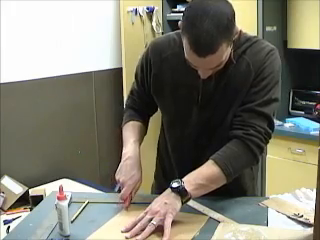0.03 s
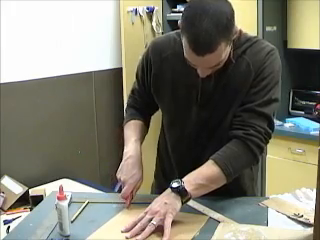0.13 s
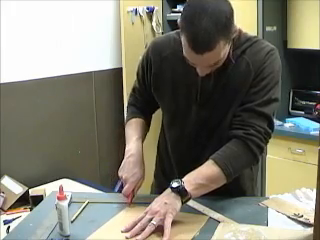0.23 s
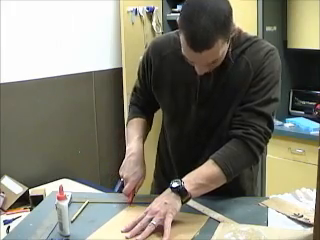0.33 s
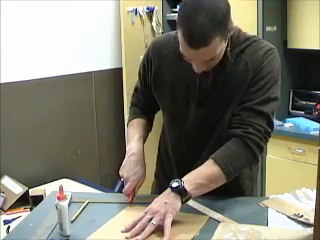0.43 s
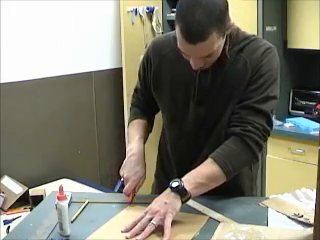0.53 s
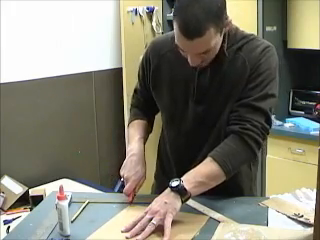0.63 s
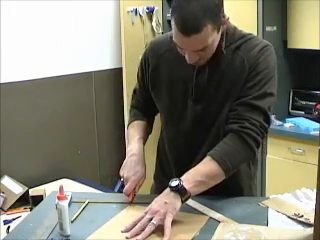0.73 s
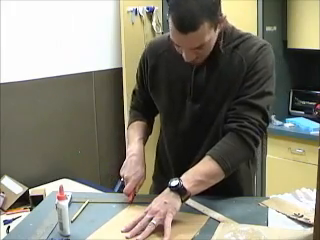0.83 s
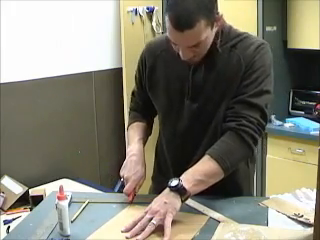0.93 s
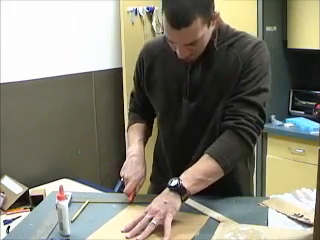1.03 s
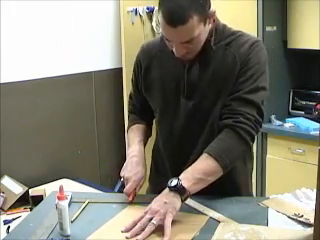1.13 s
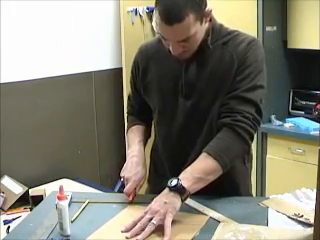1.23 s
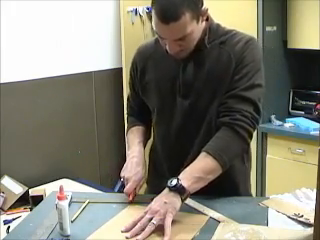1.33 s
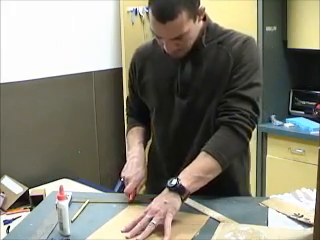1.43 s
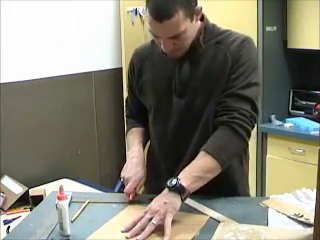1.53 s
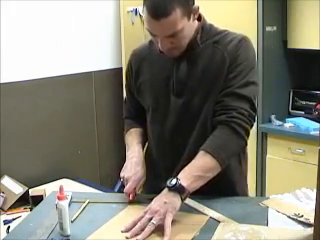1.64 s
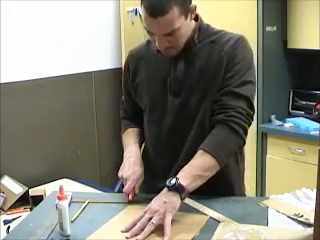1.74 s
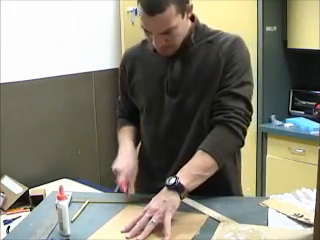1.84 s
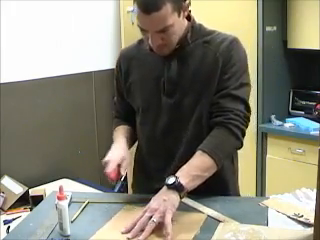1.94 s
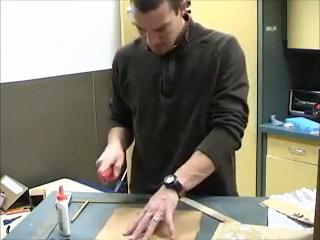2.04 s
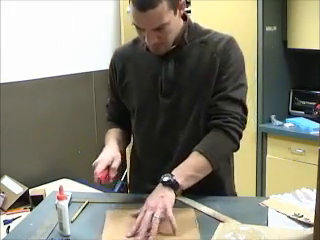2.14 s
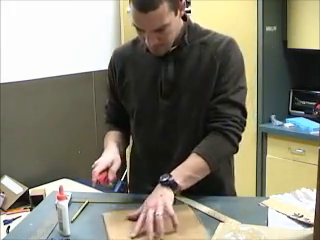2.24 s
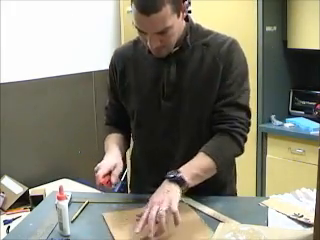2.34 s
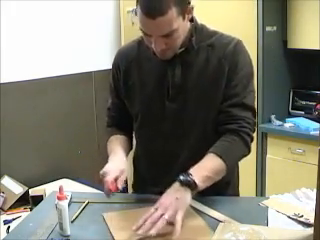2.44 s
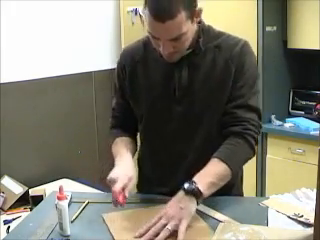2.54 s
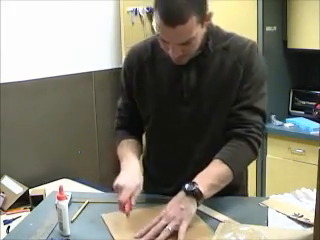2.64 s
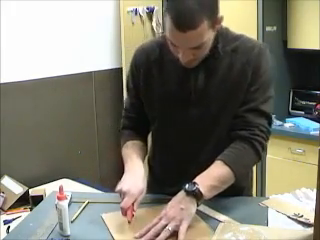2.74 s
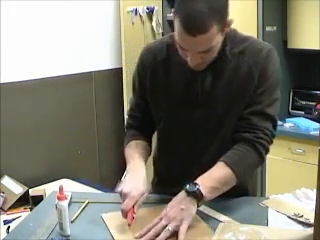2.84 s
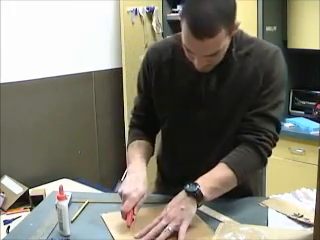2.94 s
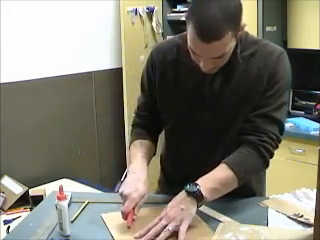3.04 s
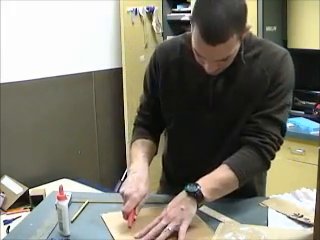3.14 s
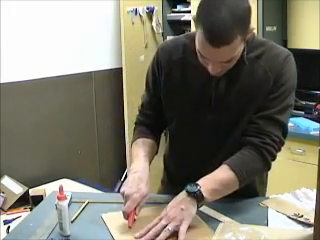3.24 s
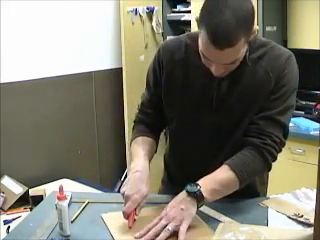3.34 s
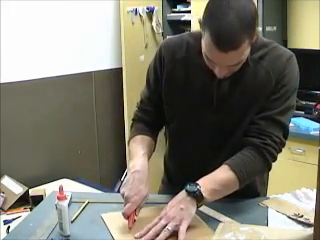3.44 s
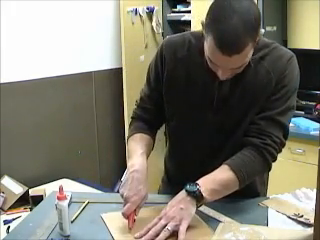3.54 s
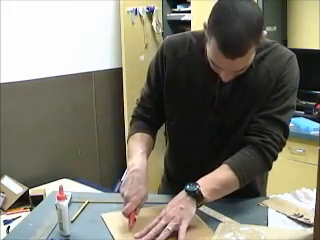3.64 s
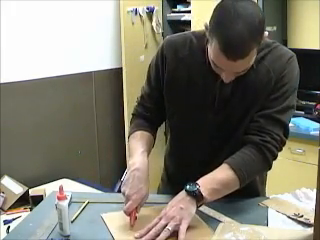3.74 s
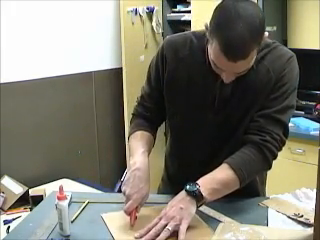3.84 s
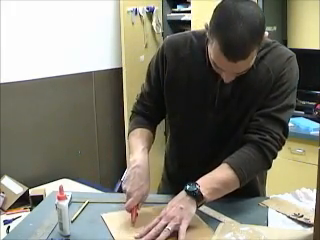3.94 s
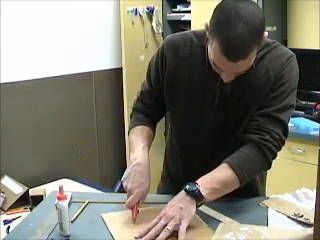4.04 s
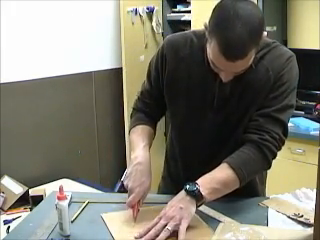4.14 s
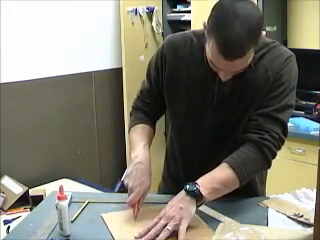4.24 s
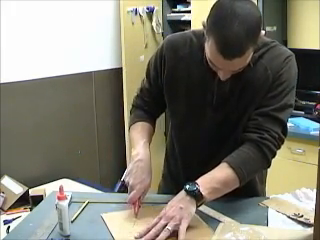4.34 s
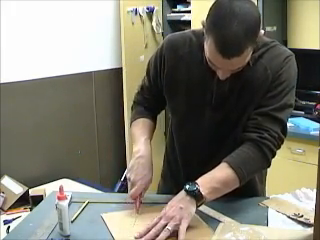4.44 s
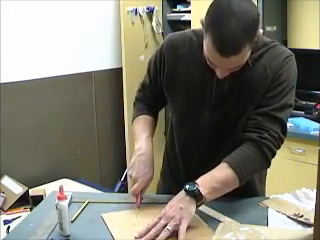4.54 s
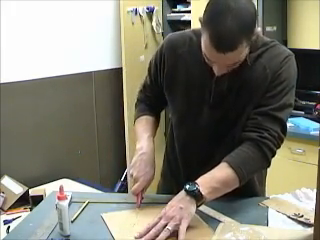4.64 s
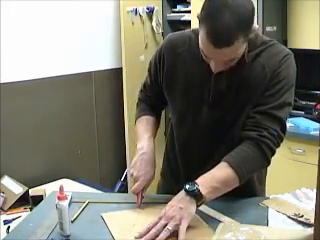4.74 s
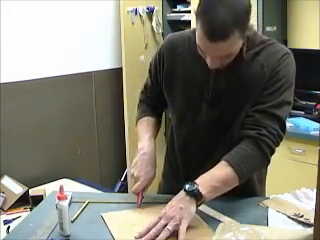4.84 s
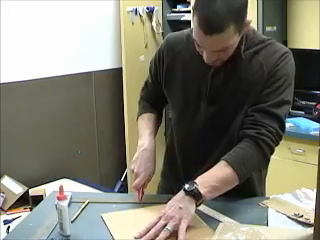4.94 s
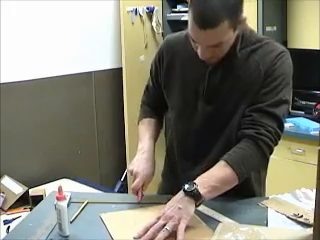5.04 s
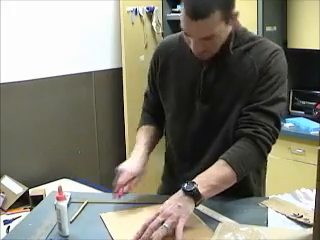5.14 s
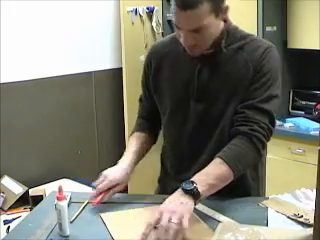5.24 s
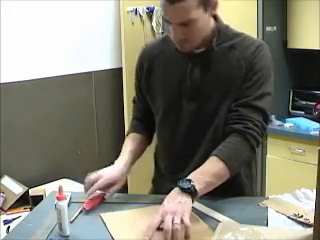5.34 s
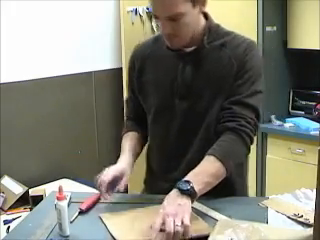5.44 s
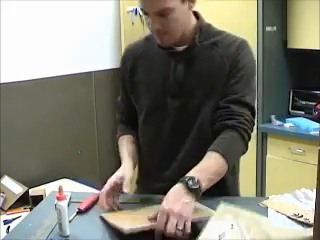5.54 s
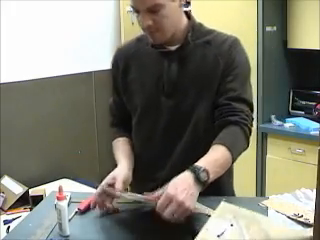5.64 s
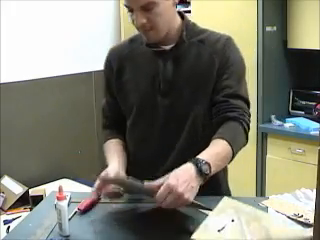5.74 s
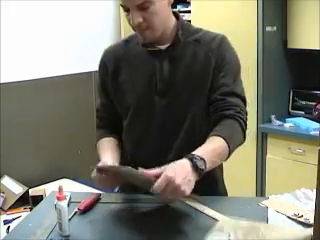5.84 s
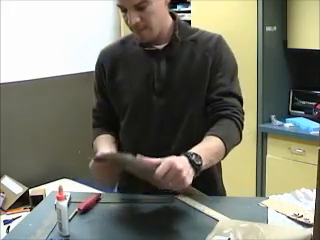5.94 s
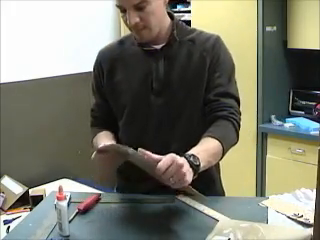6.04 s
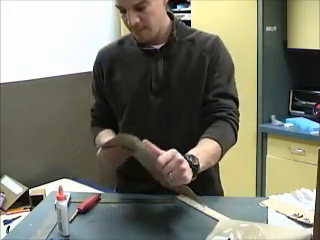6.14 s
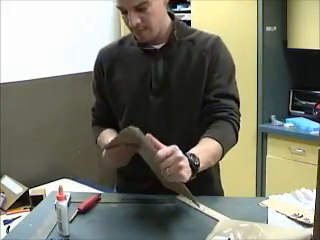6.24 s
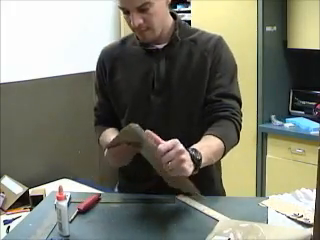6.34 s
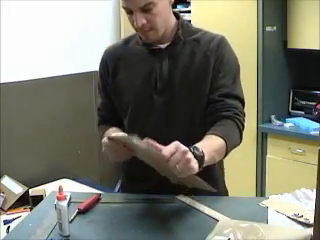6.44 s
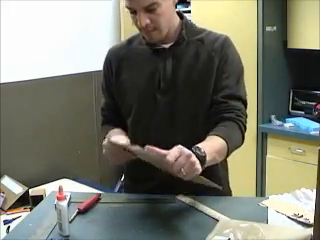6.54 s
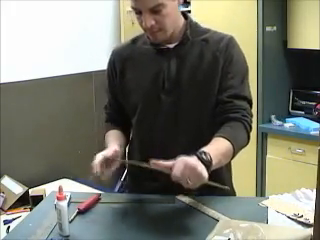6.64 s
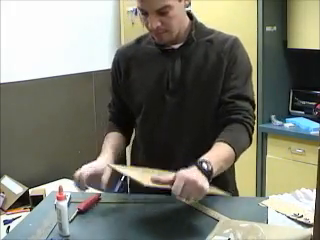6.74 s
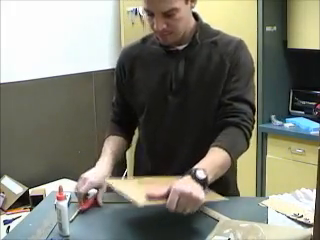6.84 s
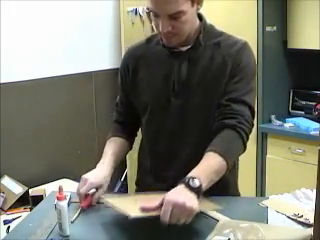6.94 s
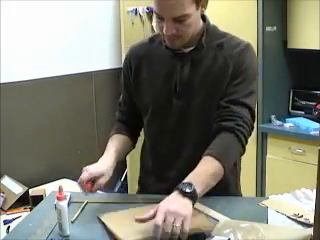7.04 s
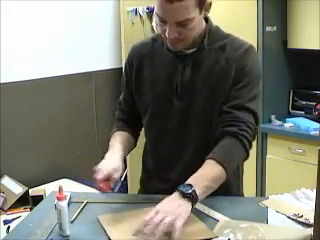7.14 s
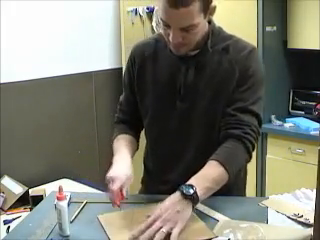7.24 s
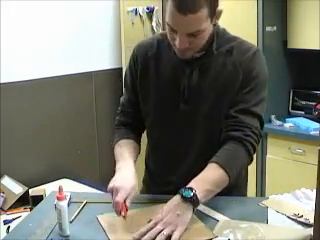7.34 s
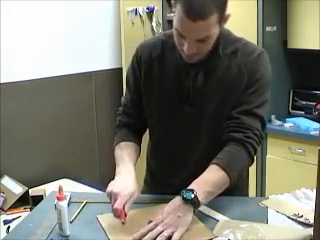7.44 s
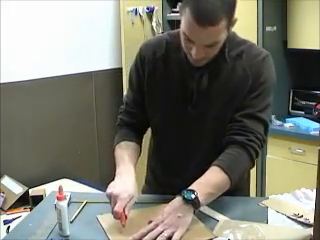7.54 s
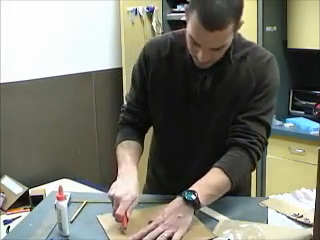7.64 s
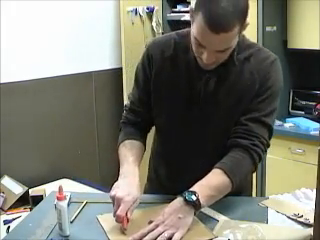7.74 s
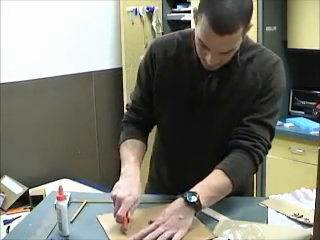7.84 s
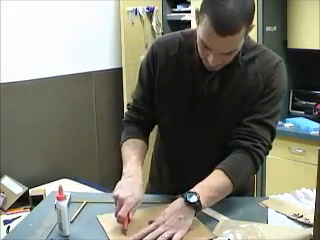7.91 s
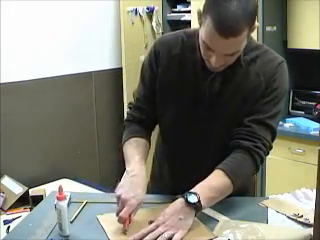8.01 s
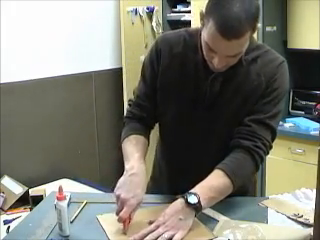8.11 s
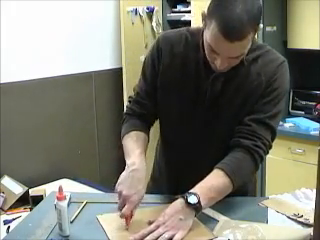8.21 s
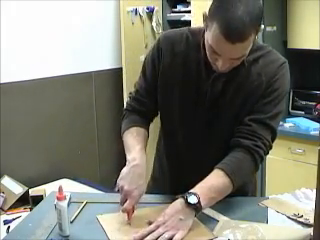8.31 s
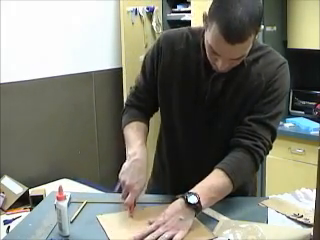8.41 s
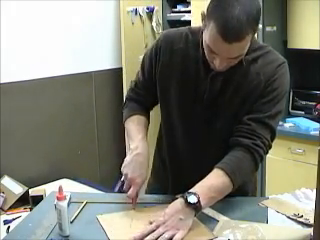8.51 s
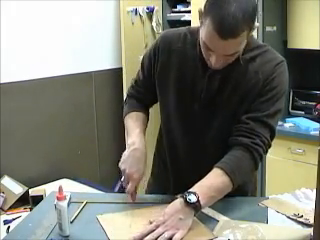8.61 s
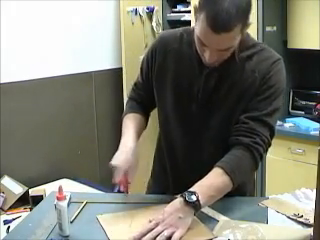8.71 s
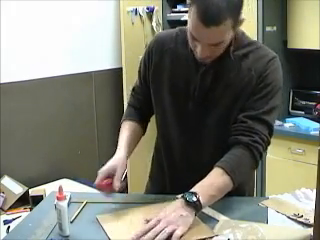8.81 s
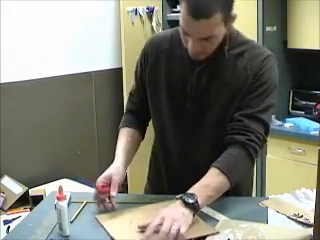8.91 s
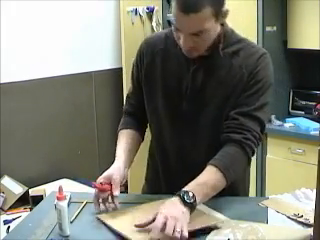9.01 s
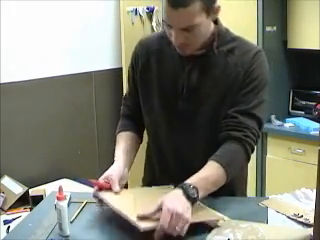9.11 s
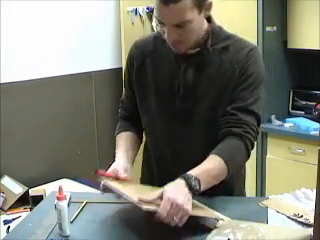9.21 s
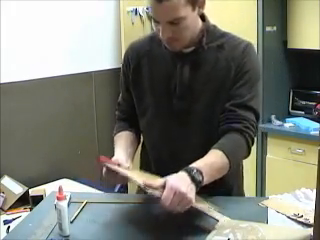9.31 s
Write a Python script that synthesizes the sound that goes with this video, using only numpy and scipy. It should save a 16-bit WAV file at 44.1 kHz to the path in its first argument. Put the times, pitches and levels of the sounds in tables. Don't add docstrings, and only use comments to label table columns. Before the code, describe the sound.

Scratchy cardboard cutting with pauses, a sharp snap, a knife dropped with a hard rattle, then a final loud rip above steady ventilation hum.

```python
import sys
import numpy as np
from scipy import signal
from scipy.fft import rfft, irfft, next_fast_len
from scipy.io import wavfile
from scipy.ndimage import uniform_filter1d

SR = 44100
rng = np.random.default_rng(int(sys.argv[2]) if len(sys.argv) > 2 else 0)


def nominal_scale(level):
    x = np.asarray(level, float) / 20
    return 10 ** x


def materialize(psi):
    bounded = np.clip(np.atleast_2d(psi).T, -1, 1)
    quanta = np.round(bounded * 32767).astype(np.int16)
    wavfile.write(sys.argv[1], SR, quanta)


N = 413216
TIME = np.arange(N) / SR
STEPS = TIME[::32]


def on_log(table, hz):
    table_hz, value = np.array(table).T
    return np.interp(np.log(hz), np.log(table_hz), value)


def band(x, hz, width_hz):
    return signal.lfilter(*signal.iirpeak(min(hz, .45 * SR), hz / width_hz, SR), x)


def colour(x, gain):
    size = next_fast_len(N + SR)
    hz = np.arange(1, size // 2 + 2) * SR / size
    return irfft(rfft(x, size) * gain(hz), size)[..., :N]


def unit(x):
    return x / np.sqrt(np.mean(x ** 2))


def walk(rate_hz):
    hold = int(len(STEPS) * SR / N / rate_hz)
    levels = np.repeat(rng.standard_normal(len(STEPS) // hold + 1), hold)
    slewed = uniform_filter1d(uniform_filter1d(levels, hold), hold)
    return unit(slewed[:len(STEPS)])


def smooth(slow):
    return np.interp(TIME, STEPS, slow)


def rub(tears_per_s=5000, scatter_db=3.5, even=1.22, grip_db=1.22, level_db=-2):
    # centre_hz, trim_db
    layers = [(150, -16), (260, -4), (850, -2), (2800, -0.5), (7500, -1), (11500, -3.5)]
    sizes = nominal_scale(scatter_db * np.minimum(rng.exponential(size=N), 3.))
    tears = (rng.random(N) < tears_per_s / SR) * rng.standard_normal(N) * sizes
    stick_slip = smooth(nominal_scale(grip_db * walk(60)))
    force = (unit(tears) + even * rng.standard_normal(N)) * stick_slip
    out = 0
    for k, (_, trim_db) in enumerate(layers):
        share = [(hz, j == k) for j, (hz, _) in enumerate(layers)]
        part = unit(colour(force, lambda hz: on_log(share, hz) / np.sqrt(hz) * (hz > 120)))
        flicker_db = .9 * walk(25)
        out = out + part * smooth(gestures(k) * nominal_scale(flicker_db + trim_db + level_db))
    return sheet(out)


def gestures(k):
    # time_s, scratch_db, weight_db
    cuts = [
        [(0.0, -32.5, -4), (0.174, -38, -5), (0.216, -42, -2), (0.24, -35, 3), (0.274, -42, -9),
         (0.278, -33.5, -2), (0.406, -37.5, -4), (0.55, -74, -3)],
        [(2.02, -51, -11), (2.048, -44, -5), (2.092, -45.5, -15), (2.274, -41.5, -12.5), (2.282, -47, -1.5),
         (2.406, -39.5, -13), (2.45, -52.5, -1), (2.56, -71.5, -5)],
        [(3.975, -43, -1), (3.981, -41, -5), (3.993, -33, 0), (4.119, -30.5, 0.5), (4.161, -41.5, -2),
         (4.181, -35.5, 6.5), (4.261, -47.5, -2), (4.27, -47, -5)],
        [(4.271, -43, 3), (4.305, -33.5, -3), (4.347, -44, 0), (4.363, -34, 0), (4.436, -36, -3),
         (4.59, -27, -4.5), (4.64, -29.5, -3), (4.723, -61, 8), (4.76, -49, -5)],
        [(8.18, -47, -3), (8.416, -30, 6), (8.424, -26.5, -3.5), (8.502, -30, 4.5), (8.541, -20, -1),
         (8.645, -23, -3.5), (8.734, -32, -7), (8.82, -62, -13), (8.87, -72, -29)],
    ]
    cut_edges = [-1.5, 0, -1.5, -2.5, -9.5]
    # start_s, scratch_db, fall_20db_s, weight_db, edge_db
    shivers = [(.279, -39, 0.21, -1.5, -2), (0.742, -37, -0.5, 0, -34), (1.53, -44, 0.5, 1, -13),
               (1.9, -44, 0.3, -11.5, -1), (2.636, -39, 0.12, -28, -6), (3.225, -52.5, 0.4, 9.5, -15),
               (3.531, -30.5, 0.13, 6, -5), (4.442, -31, 0.44, -6, -1.5), (5.025, -20, 0.14, -13, -12),
               (5.076, -25.5, 0.15, -14, -15), (5.395, -19.5, 0.105, 2, 1), (5.429, -14.5, 0.1155, 0, -2.5),
               (5.461, -21, 0.257, -1, -6.5), (5.973, -25.5, 0.11, 1.5, -15),
               (6.249, -19.5, 0.1, -10.5, -4), (6.519, -43.5, 0.05, 12, -4), (6.939, -26, 0.24, -7, -10),
               (5.967, -40, 0.02, 5, -8), (6.225, -39, 0.15, -5, 0), (7.995, -45.5, 0, -3, 0),
               (7.205, -31.5, 0.1, -2.5, -19), (8.021, -43.5, 0.35, -5, -4.5), (8.115, -41.5, 0, -1.5, -11),
               (8.423, -23.5, 0.28, -3, -22), (8.954, -31.5, 0.17, -3, -10), (9.3, -20, 0.03, -1.5, -21)]
    # peak_s, scratch_db, rise_20db_s, fall_20db_s, weight_db
    slides = [(.889, -45, 0.28, 0.07, -5), (1.49, -53, 0.5, -2.5, -18), (1.64, -55, -1.3, -0.26, 13),
              (3.28, -60.5, 1.2, 0.5, -10), (3.393, -59, -0.16, 0.7, -13), (3.487, -55.5, -0.2, 3.7, -3),
              (3.762, -31.5, 0.01, .1, -1.5), (3.82, -34.5, 0.06, 0.09, -4.5), (4.784, -32, -0.01, 0.1, -2),
              (5.004, -29.5, 0.05, 0.06, 0), (5.968, -57, 0.3, 0.23, 3), (5.77, -38, 0.1, 0.1, -2),
              (5.855, -43, 0.5, 0.3, -14), (5.925, -37.5, 0.23, 0.18, -11), (6.1, -46, 0.93, 0.45, 2.5),
              (6.234, -36, 0, 0.2, -10.5), (6.545, -51.5, 0.7, .45, 0), (6.7, -46.5, 0.5, 0.33, -2.5),
              (7.1, -46.5, 0.48, 0.17, 2.5), (7.361, -42, 0.1, 0.1, -11), (7.81, -48, 0, -0.3, -7.5),
              (8.629, -29.5, 0.1453, 0.12, -2), (9.143, -43, 1.2, 1, -3), (9.37, -37, 0.2, 2, -4)]
    # weight_share, hiss_share, fall_factor, loss_db_per_db above quiet
    follow = [(.7, 0.48, 1, 0.1), (.7, 0.2, 2.1, 0.5), (1, 0, 0.94, 0.12), (0, 0.055, 0.81, 0),
              (0, 1, .95, 0), (0, 0.68, 0.73, 0)]
    blow_rise_s, slide_edge_db, quiet_db = 0.0052, -3, -54.5
    heavy, sharp, linger, squash = follow[k]

    def gain(db, weight_db, edge_db):
        loss_db = squash * np.maximum(db - quiet_db, 0)
        return nominal_scale(db + heavy * weight_db + sharp * edge_db - loss_db)

    power = 0
    for cut, edge_db in zip(cuts, cut_edges):
        s, db, weight_db = np.array(cut).T
        stroke_db = np.interp(STEPS, s, db, -99, -99)
        power = power + gain(stroke_db, np.interp(STEPS, s, weight_db), edge_db) ** 2
    moves = [(s, db, blow_rise_s, fall_s, weight_db, edge_db) for s, db, fall_s, weight_db, edge_db in shivers]
    moves += [(*row, slide_edge_db) for row in slides]
    for s, db, rise_s, fall_s, weight_db, edge_db in moves:
        before = (s - STEPS) / max(rise_s, .001)
        after = (STEPS - s) / max(fall_s * linger, .001)
        fade = np.minimum(np.maximum(before, after), 10)
        power = power + (gain(db, weight_db, edge_db) * nominal_scale(-20 * fade)) ** 2
    return np.sqrt(power)


def sheet(x):
    # centre_hz, width_hz, lift_db
    board = [(219.3, 20, 9.5), (417, 64, -2.5), (624, 52, 6.5), (1630, 33, 3), (4140, 1440, 3)]
    # centre_hz, width_hz, lift_db
    flap = [(676, 92, 10), (1600, 120, 10), (4450, 2600, 7.7), (1500, 230, 5.7), (1090, 81, 7.4),
            (217, 56, 12.5), (650, 100, 8.2), (1030, 760, 9.1), (1060, 110, 2.9), (1400, 250, 4.7),
            (1080, 73, 8.4), (673, 77, 9), (850, 160, 10.5), (1700, 260, 7), (1060, 230, 7.2),
            (3260, 390, 7.2), (3900, 270, 5.6), (3270, 150, 5), (1900, 150, 5.6), (5230, 220, 3.4),
            (1900, 47, 5.4), (3200, 120, 6), (3550, 140, 4.7), (2040, 150, 6.4), (3400, 290, 4),
            (2300, 200, 5), (5300, 150, 6), (4000, 350, 4.3), (9900, 390, 13), (5200, 350, 8.9)]
    # start_s, end_s
    flap_spans = [(-.5, .52), (.7, 1), (2.2, 2.5), (3.5, 3.7), (3.74, 4.26), (4.42, 4.76), (4.4, 4.74),
                  (5, 5.55), (5.5, 6.1), (6.9, 7.1), (8.25, 8.55), (8.4, 8.68), (8.55, 8.85), (8.25, 8.8),
                  (8.4, 8.8), (8.2, 8.8), (-.3, .45), (.1, .45), (-.2, .15), (-.2, .15), (8.33, 8.44),
                  (8.24, 8.36), (8.38, 8.6), (8.54, 8.78), (3.96, 4.14), (4, 4.14), (4.45, 4.53),
                  (4.34, 4.5), (6.22, 6.34), (7.99, 8.07)]
    out = x + sum((nominal_scale(lift_db) - 1) * band(x, hz, width_hz) for hz, width_hz, lift_db in board)
    for (start_s, end_s), (hz, width_hz, lift_db) in zip(flap_spans, flap):
        span = (TIME > start_s) & (TIME < end_s)
        swell = np.sin(np.pi * (TIME[span] - start_s) / (end_s - start_s)) ** .5
        out[span] += (nominal_scale(lift_db) - 1) * swell * band(x[span], hz, width_hz)
    return out


def knocks(tick_db=2, rattle_db=-12):
    # start_s, peak_db, edge_db, rattle_s
    creases = [(0.279, -6, 2, 0.004), (0.878, -22, -1.5, 0.052), (1.399, -29.5, 3.5, 0.012),
               (1.4855, -23, -3, 0.042), (3.5278, 1, -6, 0.019), (3.744, -17.5, -7, 0.018),
               (3.9809, -19.5, 2, 0.018), (4.36, -19, -16, 0.048), (4.4426, -14.5, -4, 0.0099),
               (4.5936, -5, -1, 0.011), (4.9669, -14.5, -3.5, 0.029), (5.7463, -25, -31, 0.082),
               (5.842, -14.5, -21.5, 0.016), (5.884, -13, -19, 0.017), (6.245, -3, 4.5, 0.017),
               (6.527, -26.5, -8, 0.049), (9.175, -32, 9, .02), (6.2328, -15, 3, 0.011),
               (.03, -21, 4, 0.022), (4.6, -14, -7, .015)]
    # start_s, peak_db, body_db, rattle_s
    taps = [(.7416, -29, -12, 0.0081), (1.1242, -29, -13.5, 0.009), (1.5292, -10, -44, 0.0092),
            (1.7537, -23, -22, 0.012), (2.6359, -22.5, -32, .013), (3.062, -40.5, -2.5, 0.024),
            (3.3806, -30, -16, .02), (4.176, -20, -8, 0.015), (4.781, -19, -21.5, 0.079),
            (5.0247, 0.5, -21, 0.017), (5.0745, -9.5, -16.5, 0.014), (5.254, -23.5, -26, 0.08),
            (5.3924, -2.5, -14.5, 0.02), (5.4296, 3, -12, 0.01), (5.648, -23, -9.5, 0.016),
            (5.929, -20, -13, 0.0092), (5.9744, -19, -10.5, 0.024), (6.801, -25.5, -14.5, 0.039),
            (6.9378, -19, -15.5, 0.034), (6.981, -17.5, -14, 0.054), (7.1258, -20, -12.5, 0.031),
            (7.207, -27, -14, .016), (8.0208, -16, -32.5, 0.034), (8.114, -12.5, -38, 0.011),
            (8.2702, -17, -22, 0.037), (8.3427, -30.5, -2, 0.034), (8.4219, -19.5, -2, .041),
            (8.539, -22, -11, 0.06), (8.9533, -23.5, -9.5, 0.01), (9.3012, -7, -27, 0.024),
            (7.806, -26, -27, 0.035), (8.04, -23, -25, 0.013), (4.0492, -18, -15, .015),
            (4.107, -23, -16, .015), (4.5, -17, -25, .015), (4.523, -22, -25, .015),
            (4.638, -17, -20, 0.016), (.331, -25, -30, .01)]
    crease_body_db, tap_edge_db = -24, -46
    rows = [(s, db, crease_body_db, edge_db, rattle_s) for s, db, edge_db, rattle_s in creases]
    rows += [(s, db, body_db, tap_edge_db, rattle_s) for s, db, body_db, rattle_s in taps]
    out, t = np.zeros(N + SR), np.arange(SR // 8) / SR
    for s, db, body_db, edge_db, rattle_s in rows:
        blow = nominal_scale(rattle_db - 20 * t / max(rattle_s, .003)) * rng.standard_normal(len(t))
        blow[:5] += nominal_scale(tick_db) * np.array([0.8, -0.63, 0.05, -0.88, -1.07])
        sound = band(blow, 3280, 3200)
        sound += nominal_scale(body_db + 23.0) * band(blow, 1200, 1100)
        sound += nominal_scale(edge_db + 5) * band(blow, 8000, 3200)
        at = int(s * SR)
        out[at:at + len(t)] += nominal_scale(db) * sound
    return out[:N]


def rings(table, trim_db, spread=0.053, rough=0.36):
    out, t = np.zeros(N + SR), np.arange(SR // 4) / SR
    for s, db, hz, t60_s in table:
        pair = np.sin(2 * np.pi * hz * t) + .7 * np.sin(2 * np.pi * hz * (1 + spread) * t)
        chatter = 1 + rough * unit(band(rng.standard_normal(len(t)), hz / 12, hz / 6))
        onset = np.minimum(t * hz / 2, 1)
        decay = nominal_scale(db + trim_db - 60 * t / max(t60_s, .01))
        at = int(s * SR)
        out[at:at + len(t)] += decay * pair * chatter * onset
    return out[:N]


def room(x):
    # band_hz, t60_s
    decay_times = [(200, 0.087), (1000, 0.34), (4000, 0.2), (11000, 0.17)]
    bands_hz = 170 * 2 ** (np.arange(10) / 1.5)
    t = np.arange(int(.6 * SR)) / SR
    noise = rng.standard_normal((2, len(t))) * np.clip((t - .002) / 0.0012, 0, 1)
    tail = sum(band(noise, hz, hz / 2) * nominal_scale(-60 * t / on_log(decay_times, hz)) for hz in bands_hz)
    return signal.fftconvolve(x[None], tail / np.sqrt(np.sum(tail[0] ** 2)), axes=1)[:, :N]


def air():
    # freq_hz, density_db
    hiss_curve = [(150, -47), (250, -5), (800, -7), (5170, -12.5), (10500, -27.5), (11400, -60),
                  (15600, -80), (22000, -120)]
    # freq_hz, density_db
    duct_curve = [(10, -99), (20, -84), (45, -70.5), (110, -69.5), (125, -70.5), (200, -76.5), (260, -87),
                  (330, -110)]
    # pitch_hz, level_db
    hum_lines = [(18.8, -53), (28.5, -74), (51, -56.5), (60, -50), (93, -56), (120, -43), (180, -85),
                 (223, -67.5)]
    # pitch_hz, level_db
    whine_lines = [(893.6, -56), (1163, -69), (3596, -79), (3833, -70), (5216, -67.5), (6745, -68)]
    hiss_db = -47.5
    hiss = colour(rng.standard_normal((2, N)), lambda hz: nominal_scale(on_log(hiss_curve, hz)))
    hiss = hiss + nominal_scale(0.5) * band(hiss, 914, 130)
    noise = hiss * nominal_scale(hiss_db - 3) / np.std(hiss) * smooth(nominal_scale(0.3 * walk(12.0)))
    noise += colour(rng.standard_normal((2, N)), lambda hz: nominal_scale(on_log(duct_curve, hz)) * np.sqrt(SR / 2))
    mid_side = np.array([[1], [-.5]])
    for lines, sway_db, drift_rad in ((hum_lines, .6, .15), (whine_lines, 1.5, 6.)):
        for hz, db in lines:
            sway = smooth(np.sqrt(2) * nominal_scale(db + sway_db * walk(5.4)))
            phase = smooth(drift_rad * walk(3.1)) + 6 * rng.random()
            noise += mid_side * sway * np.sin(2 * np.pi * hz * TIME + phase)
    return noise


def scene():
    # start_s, peak_db, pitch_hz, t60_s
    ring_hits = [(4.175, -14.5, 1090, 0.029), (5.024, -22, 1210, 0.035), (5.075, -1, 3200, 0.022),
                 (5.392, 3.5, 1845, 0.032), (5.43, 2.5, 1820, 0.025), (5.559, -12, 2916, 0.054),
                 (5.974, -13.5, 1007, 0.043), (5.988, -9.5, 973, 0.03), (6.247, -11, 1500, 0.05),
                 (6.802, -25.5, 1450, 0.074), (6.943, -11.5, 1586, 0.1), (6.984, -13.5, 1815, .045),
                 (8.02, -30, 1600, 0.086), (8.953, -18, 2010, 0.045), (8.962, -20, 1530, 0.2),
                 (9.301, -7.5, 1914, 0.075), (9.303, -16, 2130, .08), (.742, -30, 1600, .05),
                 (4.049, -24, 1200, .03), (4.106, -19, 1090, 0.027), (4.186, -18, 1260, 0.021),
                 (6.944, -18, 4430, .05), (6.968, -19, 3000, .04), (6.983, -16.5, 4400, .05),
                 (6.982, -19, 6250, .03), (6.985, -14.5, 1194, 0.063), (7.95, -41, 2500, .03),
                 (8.271, -24, 1120, .04), (8.315, -16, 1060, .05), (8.337, -15.5, 1080, 0.046),
                 (8.34, -22, 3400, .04), (8.405, -14, 1100, 0.043), (8.421, -15, 1590, .04),
                 (8.539, -13, 3560, 0.089), (8.595, -12, 3070, 0.06), (8.718, -16, 2020, 0.063),
                 (8.72, -18, 3470, 0.054)]
    # start_s, peak_db, pitch_hz, t60_s
    clatter_hits = [(5.392, 0, 4670, .02), (5.395, -4, 947, 0.036), (5.4, -5, 4380, 0.026),
                    (5.406, -5.5, 1900, .03), (5.431, -2.5, 1426, 0.018), (5.433, 1, 2690, 0.026),
                    (5.438, 0, 2510, 0.032), (5.444, 1, 1340, 0.018), (5.452, -4.5, 1500, 0.019),
                    (5.453, -9, 2700, 0.047), (5.465, -4.5, 1296, 0.025), (5.472, -6.5, 1540, .03),
                    (5.485, -8, 1400, .04), (5.5, -16, 1187, 0.034), (5.52, -16.5, 900, 0.035),
                    (5.566, -14, 2965, .04), (5.575, -13, 1400, 0.044), (5.648, -21, 1614, 0.036),
                    (5.755, -27, 3670, .03), (5.842, -28, 4100, .04), (5.884, -21.5, 1600, 0.027),
                    (5.93, -19, 1920, .03)]
    # start_s, peak_db, pitch_hz, t60_s
    thump_hits = [(3.54, -19, 280, .07), (4.119, -22.5, 226, 0.092), (4.54, -32, 95, 0.4),
                  (4.599, -22, 680, 0.077), (5.49, -28, 216.6, 0.59), (5.987, -25.5, 341, 0.2),
                  (6.255, -23, 588, 0.17), (6.946, -27, 693, 0.24), (6.985, -24, 220, 0.21),
                  (7.127, -27, 650, 0.043), (7.211, -30, 327, 0.12), (8.976, -16.5, 650, 0.061),
                  (8.991, -21, 456, 0.19), (8.995, -25.5, 305, 0.093)]
    # freq_hz, side_gain_db
    side_share = [(25, -17), (120, -25.5), (300, -7), (900, -6.5), (1300, -9), (2300, -7.5), (2700, -37)]
    scratch = rub()
    blows = knocks()
    tones = rings(ring_hits + clatter_hits, -6.0) + rings(thump_hits, -4.5)
    send = nominal_scale(-12.5) * scratch + nominal_scale(-4.5) * blows + nominal_scale(-9.5) * tones
    mid, side = room(send) * nominal_scale([[0], [-2]]) + air()
    mid = mid + scratch + blows + tones
    side = colour(side, lambda hz: nominal_scale(on_log(side_share, hz)))
    return np.array([mid + side, mid - side])


def thrift(x, side_db=-11, side_floor_db=-97, top_db=-19, top_floor_db=-101):
    hz, _, (mid, side) = signal.stft(np.array([x[0] + x[1], x[0] - x[1]]) / 2, SR, nperseg=2048)

    def patch(z, size):
        means = uniform_filter1d(abs(z), size, axis=0)[size // 2::size]
        return np.repeat(means, size, axis=0)[:len(hz) - 1]

    scratch = np.mean(abs(mid[(hz > 3000) & (hz < 9000)]), axis=0)
    body = np.mean(abs(mid[(hz > 500) & (hz < 4000)]), axis=0)
    side[:-1] *= patch(side, 4) > nominal_scale(side_floor_db) + nominal_scale(side_db) * body
    audible = patch(mid, 8) > nominal_scale(top_floor_db) + nominal_scale(top_db) * scratch
    mid[:-1] *= audible | (hz[:-1, None] < 7000)
    mid, side = signal.istft(np.array([mid, side]), SR, nperseg=2048)[1][:, :N]
    return np.array([mid + side, mid - side])


def low_pass(x):
    return signal.sosfilt(signal.butter(12, 13200, fs=SR, output="sos"), x)


def record(dry):
    notch_lag_samples, return_lag_samples, top_hz = 294.15, 294.85, 11620

    def echo(hz, lag_samples):
        return np.exp(-2j * np.pi * hz * lag_samples / SR)

    def comb(hz):
        cancel = 1 - (.9 - hz / 22000) * echo(hz, notch_lag_samples)
        return .9 * cancel / (1 - .47 * echo(hz, return_lag_samples))

    overloaded = np.tanh(0.75 * colour(dry, comb)) / 0.9
    dull = signal.sosfilt(signal.ellip(8, .3, 60, top_hz, fs=SR, output="sos"), overloaded)
    mix = np.clip(thrift(dull), -1, 1)
    return low_pass(mix)


dry = scene()
out = record(dry)
materialize(out)
```